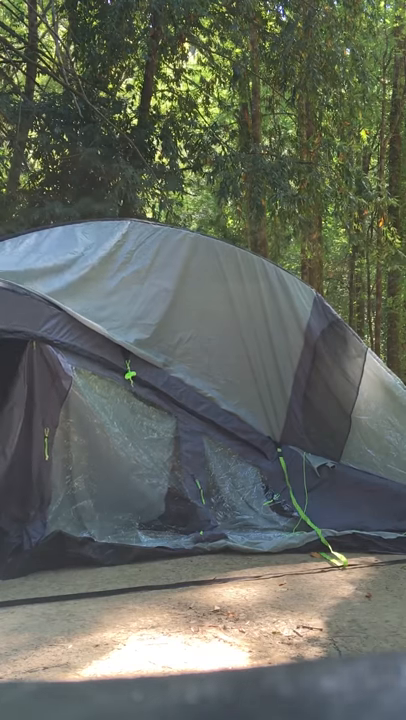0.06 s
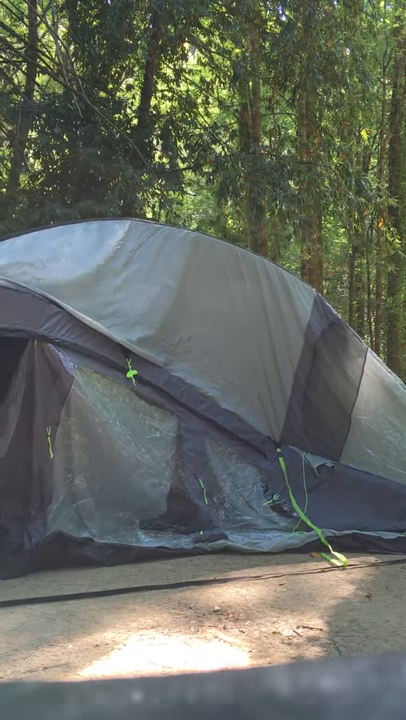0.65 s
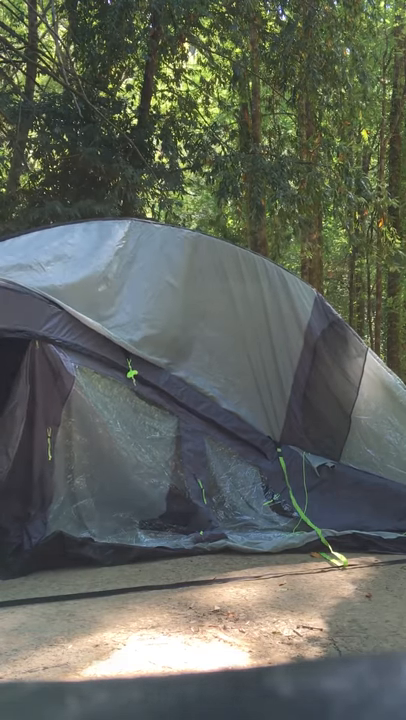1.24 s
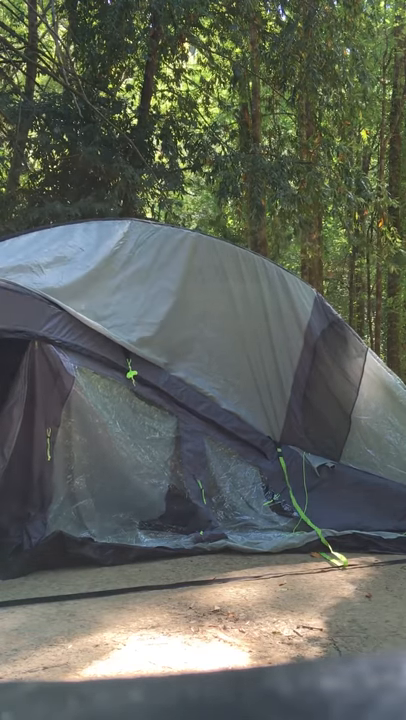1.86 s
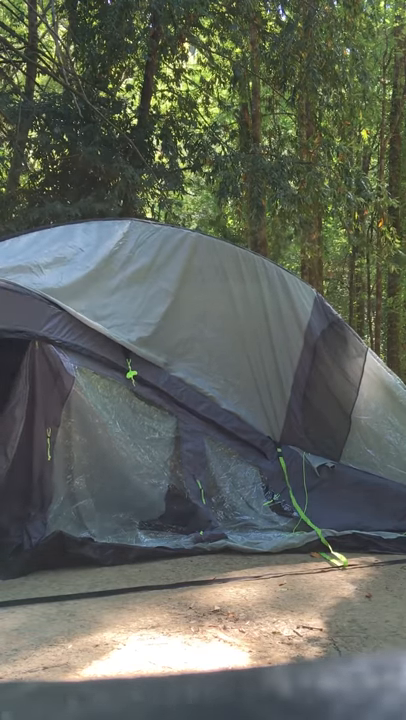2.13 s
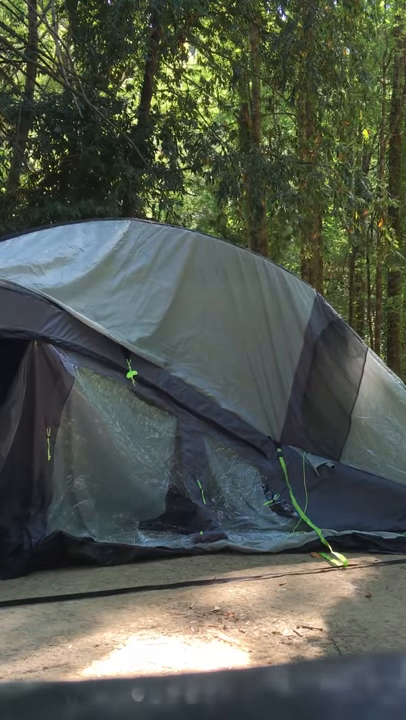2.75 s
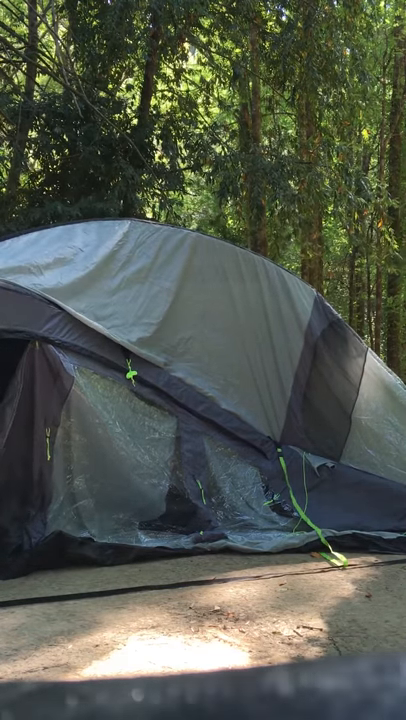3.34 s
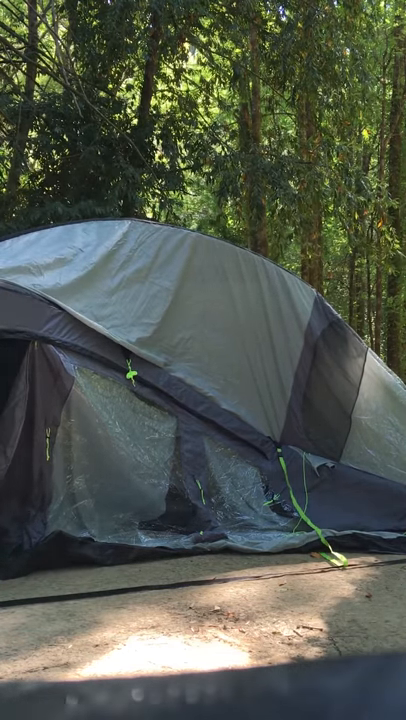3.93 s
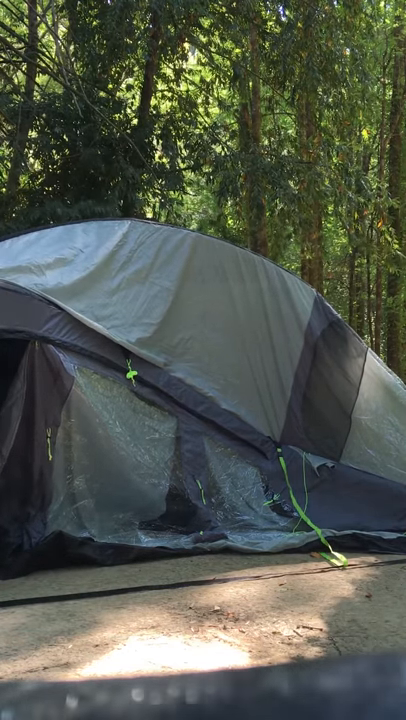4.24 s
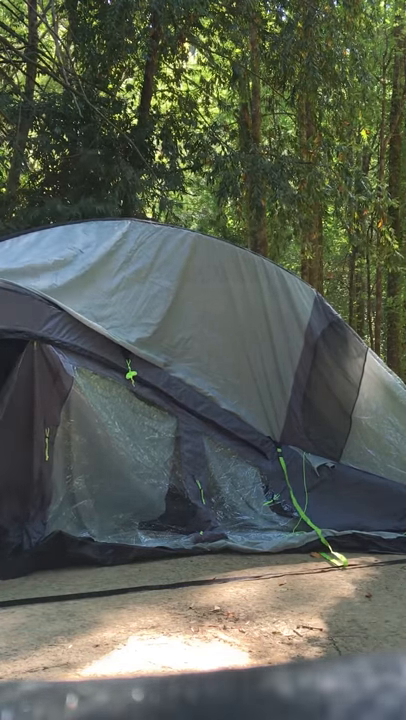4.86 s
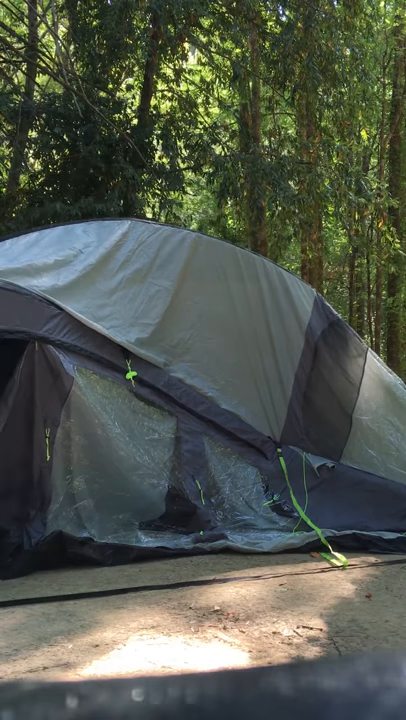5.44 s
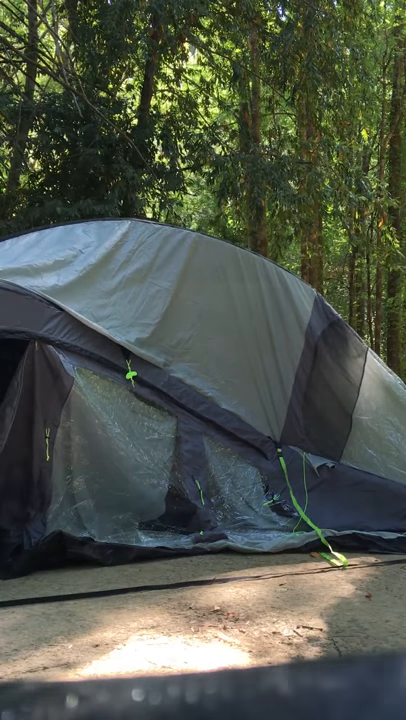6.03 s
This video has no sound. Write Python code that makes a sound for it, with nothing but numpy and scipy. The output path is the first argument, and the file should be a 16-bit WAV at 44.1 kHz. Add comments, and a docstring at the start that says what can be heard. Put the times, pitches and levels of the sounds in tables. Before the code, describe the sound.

Steady close hammer knocks and thuds on a metal tent peg in a hushed forest clearing, as a light breeze buffets the microphone.

```python
"""Tent peg at a woodland campsite

Close to the microphone, a hammer drives a steel peg into packed earth with eleven even blows.
A sleeve swishes ahead of each blow, which clicks, knocks, thuds in the ground and scrapes the peg
deeper; the clearing and the far trunks return a faint tail. Gear knocks and rustles, and a small bird
chirps off in the hush of the trees. Handling thumps the microphone at first; later a breeze buffets it."""
import sys
import numpy as np
from scipy import signal
from scipy.fft import rfft, irfft
from scipy.io import wavfile
from scipy.ndimage import uniform_filter1d

SR = 44100
rng = np.random.default_rng(int(sys.argv[2]) if len(sys.argv) > 2 else 0)


def generate_wav(signal):
    """Clip the signal to [-1, 1] and save it as 16-bit WAV at the path in sys.argv[1]."""
    frames = np.transpose(np.atleast_2d(signal))
    scaled = np.clip(frames, -1, 1) * 32767
    pcm = np.round(scaled).astype(np.int16)
    wavfile.write(sys.argv[1], SR, pcm)


N = 272979

# the far hush of the wood: (frequency [Hz], level [dB])
AIR_COLOUR = [(60, -16.5), (150, -13.5), (286, -20), (400, -25), (540, -29.5), (760, -24.5), (1100, -25),
              (1450, -28), (2220, -35), (3500, -40), (8500, -45), (10500, -49), (15500, -50)]
# low handling thumps on the microphone at the start, then the breeze: (time [s], relative level [dB])
HANDLING_LEVELS = [(0.0, -50), (0.072, -45.5), (0.118, -71), (0.216, -40.5), (0.362, -53.5), (0.42, -59)]
BREEZE_LEVELS = [(2.7, -60), (3.01, -37), (3.19, -47), (3.4, -37.5), (3.43, -44), (3.55, -48.5),
                 (3.93, -35.5), (3.98, -49), (4.03, -40), (4.39, -48), (4.42, -34.5), (5.32, -50),
                 (5.35, -37), (5.38, -50), (5.49, -36.5), (5.59, -52.5), (5.66, -48.5), (5.77, -63),
                 (5.8, -54.5), (5.89, -62.5), (6.08, -49), (6.19, -50)]
# low rumble and small eddies at the microphone: (frequency [Hz], level [dB])
BUFFET_COLOUR = [(15, -19), (28, -16.5), (48, 2), (75, 0.5), (110, -6.5), (166, -24.5), (276, -27),
                 (420, -63), (900, -100)]
EDDY_COLOUR = [(40, -45), (90, 0.5), (150, 10), (230, -7.5), (330, -14.5), (500, -42), (1000, -63)]
# the strongest single bumps of wind: (time [s], level [dB])
WIND_BUMPS = [(0.215, -36.5), (2.929, -36.5), (3.016, -35), (3.772, -36), (3.885, -38.5), (3.917, -39),
              (4.417, -39), (4.664, -34), (5.444, -40)]

# the distant bird: (time [s], length [s], start pitch [Hz], end pitch [Hz], level at the bird [dB])
BIRD_CHIRPS = [(1.053, 0.041, 8450, 8200, -57), (1.073, 0.021, 7370, 6440, -61.5),
               (1.717, 0.043, 8500, 8000, -63.5), (1.896, 0.035, 8400, 8700, -55),
               (5.073, 0.037, 8330, 8200, -59.5), (5.103, 0.016, 8250, 6570, -57.5)]
# its echo among the trees: (frequency [Hz], t60 [s])
BIRD_ECHO_T60 = [(4000, 0.59), (7000, 0.64), (9000, 0.35)]

# handled cloth and kit: (frequency [Hz], level [dB])
GEAR_COLOUR = [(150, 5.5), (350, 13), (600, -15), (900, 7), (1300, -1.5), (2000, -1.5), (2700, -6.5),
               (5000, -9.5), (9000, -17), (16000, -27)]
# small knocks of gear: (time [s], level [dB], hollow resonance [Hz])
GEAR_KNOCKS = [(0.0245, -38, 1780), (0.051, -37.5, 340), (0.0789, -40.5, 940), (0.201, -52, 1110),
               (0.224, -37.5, 1870), (0.303, -46, 1136), (4.979, -40.5, 330), (5.672, -44, 735)]
# rustles of tent cloth: (time [s], level [dB], t60 [s])
TENT_RUSTLES = [(.08, -49.5, 0.21), (0.096, -53.5, 0.16), (0.159, -50, 0.16), (.222, -50, 0.11),
                (4.19, -61, 0.87), (4.299, -55, 0.23), (4.98, -54, 0.21), (5.387, -52.5, 0.2)]
# faint ticks of cloth and twigs: (time [s], level [dB])
TWIG_TICKS = [(3.394, -54.5), (4.633, -52), (5.205, -52), (5.273, -54.5), (6.129, -61)]
# the swish of a sleeve: (frequency [Hz], level [dB])
SLEEVE_COLOUR = [(1500, -16), (3000, -7), (5000, -4), (7000, -11), (8300, 1), (10200, -11), (11600, -3),
                 (15500, -10)]

# sound scattered by the clearing and by the far trunks: (frequency [Hz], level [dB])
CLEARING_COLOUR = [(100, -46), (300, 2.5), (600, 2.5), (1000, 4), (1600, 3.5), (2400, -10), (3100, -5.5),
                   (5000, -11), (7000, -14), (9000, -8.5), (10300, -17.5), (15500, -8)]
TRUNKS_COLOUR = [(100, 13), (500, -11), (1100, 3), (2300, -11), (3500, -7.5), (5000, -11.5), (6700, -2.5),
                 (8700, -9), (10300, -13), (15500, -21)]
# how each of these tails dies away: (frequency [Hz], t60 [s])
CLEARING_T60 = [(200, 0.26), (1200, 0.12), (5000, 0.22), (15000, 0.081)]
TRUNKS_T60 = [(100, 1), (1000, 0.7), (4000, 1), (7000, 0.55), (11000, 0.54), (16000, 0.43)]
# echoes off the tent and things nearby: (delay [s], level [dB])
NEAR_ECHOES = [(.0052, -17), (.0098, -25.5), (0.0137, -20.5), (0.0253, -28), (.0262, -30.5)]

# a blow's contact click, dull knock and deep after-rumble: (frequency [Hz], level [dB])
CLICK_COLOUR = [(500, -2), (1800, 3), (2450, -7), (3050, 2.5), (4400, -2), (6000, -3), (8500, -4.5),
                (10200, -13), (11500, -8.5), (15500, -23)]
KNOCK_COLOUR = [(100, -32), (520, -37.5), (680, -12.5), (850, -3.5), (1000, 4), (1280, -3.5), (1550, -3),
                (2000, -6.5), (4000, -22)]
BOOM_COLOUR = [(20, -30), (35, -13), (55, 4.5), (85, 8), (125, -17), (200, -15), (500, -82)]
# the earth round the peg, first its long ring, then the thud: (frequency [Hz], level [dB], t60 [s])
EARTH_MODES = [(119.7, -34.5, 0.41), (177, -39, 0.14), (227.5, -31.5, 0.089), (259.6, -22.5, 0.046),
               (306.8, -37.5, 0.13), (389, -25, 0.049), (496, -34, 0.071), (621, -34, 0.057),
               (765, -28.5, 0.035)]
# the steel peg, quickly damped by the soil: (frequency [Hz], level [dB], t60 [s])
PEG_MODES = [(2868, -35, 0.018), (3300, -46.5, 0.04), (3750, -51.5, 0.063), (4070, -60, 0.066),
             (5270, -40, 0.018), (6300, -60, 0.19), (6720, -59, 0.13), (8500, -55, 0.081)]
# hammer blows: (time [s], knock gain [dB], knock upper edge [Hz], scrape pitch [Hz], scrape gain [dB])
HAMMER_BLOWS = [(0.5306, -1, 1510, 4000, -13), (0.8424, 0, 1520, 3430, -14), (1.149, 1, 1610, 3220, -2),
                (1.466, 0.5, 1710, 4520, -2), (1.7866, 2, 1850, 4990, -6), (2.1145, 1.5, 1970, 4500, -0.5),
                (2.4657, 3, 2100, 4400, 6), (2.8552, 3, 2100, 4830, -2), (3.2412, 1.5, 1740, 5030, 1.5),
                (3.6081, 0, 1940, 5060, -2), (3.9696, 0.5, 1740, 5230, 1.5)]
# the hammer touches the peg again as it rebounds: (time [s], contact gain [dB], thud gain [dB])
HAMMER_REBOUNDS = [(2.1334, -8.5, -7.5), (2.8801, -11, -3.5), (3.263, -12.5, -41), (3.9942, -10, -7.5),
                   (4.014, -25, -6)]


def amp(db):
    return 10 ** (np.asarray(db) / 20)


def unit_rms(x):
    return x / np.sqrt(np.mean(x ** 2) + 1e-20)


def seconds(size):
    return np.arange(size) / SR


def at_frequency(table, hz):
    """Read a table along a logarithmic frequency axis."""
    table_hz, values = np.transpose(table)
    return np.interp(np.log(hz + 1), np.log(table_hz + 1), values)


def add(mix, start_s, sound):
    part = mix[max(round(start_s * SR), 0):][:len(sound)]
    part += sound[:len(part)]


def noise(colour, size, tilt_db=0):
    """Noise of rms 1 with the given spectrum, tilted by dB per octave."""
    hz = np.fft.rfftfreq(size, 1 / SR)
    gain = amp(at_frequency(colour, hz) + tilt_db * np.log2(hz + 1))
    return unit_rms(irfft(rfft(rng.standard_normal(size)) * gain, size))


def wander(t, samples):
    """A random waver of rms 1, smoothed over this many samples."""
    return unit_rms(uniform_filter1d(rng.standard_normal(len(t)), size=samples))


def pulse(colour, edge_hz, order, size=4096):
    """The causal pulse of peak 1 with this spectrum, cut off above edge_hz."""
    hz = abs(np.fft.fftfreq(size, 1 / SR))
    rolloff = np.sqrt(1 + (hz / edge_hz) ** (2 * order))
    log_gain = np.log(amp(at_frequency(colour, hz)) / rolloff + 1e-4)
    wave = np.fft.ifft(np.exp(np.conj(signal.hilbert(log_gain)))).real
    return wave / abs(wave).max()


def blows_by_depth():
    """Each blow with the depth that the peg has reached, 0 at the first to 1 at the last."""
    return zip(np.linspace(0, 1, len(HAMMER_BLOWS)), HAMMER_BLOWS)


def air(level_db=-58.5):
    """The steady far hush of the wood."""
    return amp(level_db) * noise(AIR_COLOUR, N)


def handling_and_breeze(gain_db=1, flutter_db=1.1, eddy_db=-15, lumps_db=5, gust_power=0.8, gust_db=-36):
    """Low handling thumps on the microphone, then lumpy gusts; stronger ones shed more small eddies."""
    level_db = gain_db + np.interp(seconds(N), *np.transpose(HANDLING_LEVELS + BREEZE_LEVELS))
    rumble = noise(BUFFET_COLOUR, N)
    swell = np.sqrt(uniform_filter1d(abs(signal.hilbert(rumble)) ** 2, size=4000))
    lumps = np.clip(noise([(4, 0), (16, 0), (40, -60), (100, -140)], N), -2, 1.5)
    buffeting = unit_rms(rumble / swell * amp(flutter_db * lumps))
    eddies = unit_rms(noise(EDDY_COLOUR, N) * amp(lumps_db * lumps))
    eddy_level_db = gust_db + eddy_db + gust_power * (level_db - gust_db)
    return amp(level_db) * buffeting + amp(eddy_level_db) * eddies


def wind_bumps(width_s=0.0054):
    """Single eddies strike the microphone, each a short low bump."""
    out, t = np.zeros(N), seconds(4096)
    window = np.exp(-((t - t.mean()) / width_s) ** 2)
    for time, db in WIND_BUMPS:
        bump = unit_rms(noise(EDDY_COLOUR, len(t)) * window) * np.sqrt(np.mean(window ** 2))
        add(out, time - t.mean(), amp(db) * bump)
    return out


def diffuse_tail(colour, t60_table, rise_s=0.0033, size=32768):
    """Many small reflections merge into noise that dies at its own rate in each band."""
    hz, age, spectrum = signal.stft(noise(colour, size), SR, nperseg=256)
    decay = amp(-60 * age / at_frequency(t60_table, hz)[:, None])
    tail = signal.istft(spectrum * decay, SR, nperseg=256)[1][:size]
    return tail * (1 - np.exp(-(seconds(size) / rise_s) ** 2))


def among_trees(sound, direct_db=-5.5, wet_db=-3.5):
    """A distant sound reaches the microphone with a wash of scatter from the trunks."""
    tail = diffuse_tail(TRUNKS_COLOUR, BIRD_ECHO_T60)
    wash = signal.fftconvolve(sound, tail / np.linalg.norm(tail))[:N]
    return amp(direct_db) * sound + amp(wet_db) * wash


def bird(trill_depth_hz=290, trill_rate_hz=190):
    """Thin gliding chirps with a fast, uneven trill."""
    out = np.zeros(N)
    for time, length, start_hz, end_hz, db in BIRD_CHIRPS:
        t = seconds(round(length * SR))
        trill = np.sin(2 * np.pi * trill_rate_hz * t) + 0.89 * wander(t, samples=30)
        hz = np.linspace(start_hz, end_hz, len(t)) + trill_depth_hz * trill
        chirp = np.sin(2 * np.pi * np.cumsum(hz) / SR) * signal.windows.tukey(len(t), 0.5)
        add(out, time, amp(db) * unit_rms(chirp))
    return out


def touch(hz, t60, tilt_db, hollow_db, grain_db=3, tail_db=-26, tail_t60=1.0, softness=0.009):
    """One grainy touch of cloth or kit with a hollow resonance at hz; long ones start softly."""
    t = seconds(16000)
    rustle = noise(GEAR_COLOUR, len(t), tilt_db) * amp(grain_db * wander(t, samples=70))
    hollow = signal.lfilter(*signal.iirpeak(hz, Q=4, fs=SR), rustle)
    fade = np.hypot(amp(-60 * t / t60), amp(tail_db - 60 * t / tail_t60))
    attack = 1 - np.exp(-t / (softness * t60))
    return unit_rms(rustle + amp(hollow_db) * hollow) * fade * attack


def gear():
    """Around the tent: short dull knocks, longer bright rustles and thin ticks."""
    out = np.zeros(N)
    for time, db, hz in GEAR_KNOCKS:
        add(out, time, amp(db) * touch(hz, t60=0.049, tilt_db=-2, hollow_db=9.5))
    for time, db, t60 in TENT_RUSTLES:
        add(out, time, amp(db) * touch(hz=1840, t60=t60, tilt_db=2.6, hollow_db=0))
    for time, db in TWIG_TICKS:
        add(out, time, amp(db) * touch(hz=6100, t60=0.027, tilt_db=2, hollow_db=1.5))
    return out


def sleeve(level_db=-64, sink_db=-6, width_s=0.041, weave_hz=5100, weave_db=10):
    """A soft swish ahead of each blow; the weave of the cloth gives it a thin pitch."""
    out, t = np.zeros(N), seconds(10000)
    window = np.exp(-((t - t.mean()) / width_s) ** 2)
    for depth, (time, *_) in blows_by_depth():
        lead_s = 0.087 if depth else 0.018
        cloth = noise(SLEEVE_COLOUR, len(t))
        weave = signal.lfilter(*signal.iirpeak(weave_hz, Q=14, fs=SR), cloth)
        swish = unit_rms(cloth + amp(weave_db) * weave) * window
        add(out, time - lead_s - t.mean(), amp(level_db + sink_db * depth) * swish)
    return out


def scatter(near_db=-35, far_db=-52):
    """The clearing answers each blow at once; the far trunks add a long, thin wash."""
    out = np.zeros(N)
    for time, knock_db, *_ in HAMMER_BLOWS:
        clearing = diffuse_tail(CLEARING_COLOUR, CLEARING_T60, rise_s=0.012)
        trunks = diffuse_tail(TRUNKS_COLOUR, TRUNKS_T60, rise_s=0.017)
        add(out, time, amp(knock_db + near_db) * clearing + amp(knock_db + far_db) * trunks)
    return out


def beside_tent(sound):
    """The direct sound and single echoes from close by, dulled by cloth and soil."""
    out = sound.copy()
    dull = signal.sosfilt(signal.butter(1, 3500, fs=SR, output="sos"), sound)
    for delay, db in NEAR_ECHOES:
        add(out, delay, amp(db) * dull)
    return out


def boom(t, level_db=-46.5, rise_s=0.017, t60=0.8):
    """The deep after-rumble of a blow."""
    return amp(level_db - 60 * t / t60) * (1 - np.exp(-t / rise_s)) * noise(BOOM_COLOUR, len(t))


def earth(t, thud_db, ring_db, rise_s=0.0024, detune=0.049):
    """Low modes swell as the peg pushes the soil; the damped ones shift from blow to blow."""
    (ring_hz, db, t60), *thud_modes = EARTH_MODES
    out = amp(db + ring_db - 60 * t / t60) * np.sin(2 * np.pi * ring_hz * t)
    for hz, db, t60 in thud_modes:
        hz *= 1 + detune * rng.standard_normal()
        out -= amp(db + thud_db - 60 * t / t60) * np.sin(2 * np.pi * hz * t)
    return out * (1 - np.exp(-t / rise_s))


def scrape(t, hz, peak_s=0.009, width_s=0.0033, waver=0.017, grit=0.71):
    """The peg slides deeper: a very short unsteady squeak in a rasp of grit."""
    pitch_hz = hz * (1 + waver * wander(t, samples=24))
    squeak = np.sin(2 * np.pi * np.cumsum(pitch_hz) / SR)
    return (squeak + grit * noise(CLICK_COLOUR, len(t))) * np.exp(-((t - peak_s) / width_s) ** 2)


def peg(t, unevenness_db, detune):
    """Where the hammer lands decides which modes of the peg speak."""
    out = np.zeros(len(t))
    for hz, db, t60 in PEG_MODES:
        db += unevenness_db * rng.standard_normal()
        hz *= 1 + detune * rng.standard_normal()
        out += amp(db - 60 * t / t60) * np.sin(2 * np.pi * hz * t)
    return out


def click(t, t60):
    """Hard contact: a burst of bright noise that dies in milliseconds."""
    return noise(CLICK_COLOUR, len(t)) * amp(-60 * t / t60)


def knock(edge_hz, lag_hz=1120, unevenness_db=1.55):
    """A dull pulse, never quite the same colour, whose middle tones lag so that its pitch falls."""
    colour = [(hz, db + unevenness_db * rng.standard_normal()) for hz, db in KNOCK_COLOUR]
    _, poles = signal.iirpeak(lag_hz, Q=1.23, fs=SR)
    return signal.lfilter(poles[::-1], poles, pulse(colour, edge_hz, order=12))  # all-pass lag


def hammer(thud_lag_s=0.00327, grip_depth=0.68, grip_db=-9):
    """Close blows and light rebounds; the knock brightens as the peg bites firmer ground."""
    out, t = np.zeros(N), seconds(20000)
    for depth, (time, knock_db, edge_hz, scrape_hz, scrape_db) in blows_by_depth():
        # as the peg sinks, the click softens and the steel rings more
        add(out, time, amp(-26.23 - 2 * depth) * click(t, t60=0.031))
        add(out, time, amp(-2 + 3 * depth) * peg(t, unevenness_db=5, detune=0.0124))
        add(out, time, amp(scrape_db - 35.5) * scrape(t, scrape_hz))
        add(out, time, -amp(knock_db - 12.5) * knock(edge_hz))
        # past grip_depth the soil damps the ring of the ground
        ring_db = -1.1 + grip_db * np.interp(depth, [grip_depth, 1], [0, 1])
        add(out, time + thud_lag_s, earth(t, thud_db=0.05, ring_db=ring_db))
        add(out, time, boom(t))
    for time, contact_db, thud_db in HAMMER_REBOUNDS:
        # a light touch rings the peg but makes little click
        contact = amp(-26) * click(t, t60=0.0082) + peg(t, unevenness_db=6, detune=0.0081)
        add(out, time, amp(contact_db) * contact)
        add(out, time, amp(contact_db - 18) * knock(edge_hz=1700))
        add(out, time, earth(t, thud_db, ring_db=-28))
    return out


def scene(low_cut_hz=26):
    """One microphone in the clearing: close hammering, gear, a far bird, handling, wind and hush."""
    low_cut = signal.butter(3, low_cut_hz, "high", fs=SR, output="sos")
    rumble = signal.sosfilt(low_cut, handling_and_breeze() + wind_bumps())
    hammering = beside_tent(hammer()) + scatter()
    return (hammering + gear() + among_trees(bird()) + sleeve() + rumble + air())[None]


def record(dry):
    """The recorder's band limit cuts off the highest treble."""
    low_pass = signal.firwin(301, cutoff=15950, window=("kaiser", 8), fs=SR)
    return signal.oaconvolve(dry, low_pass[None], "same")


dry = scene()
out = record(dry)
generate_wav(out)
```